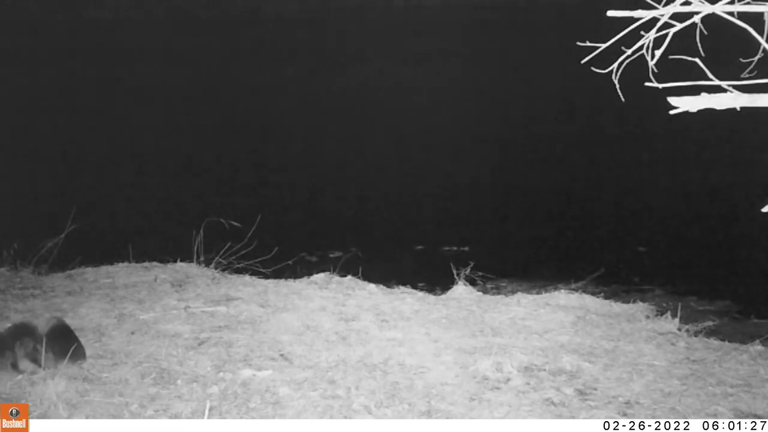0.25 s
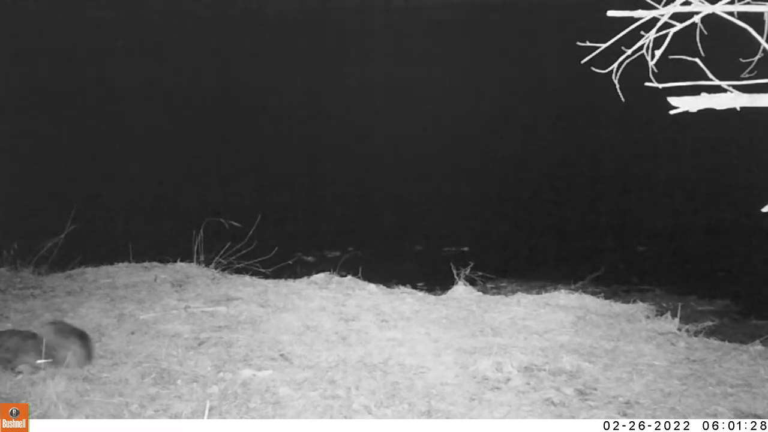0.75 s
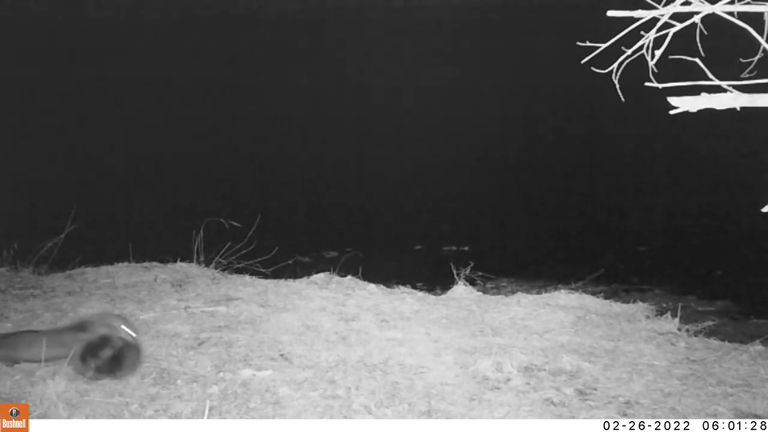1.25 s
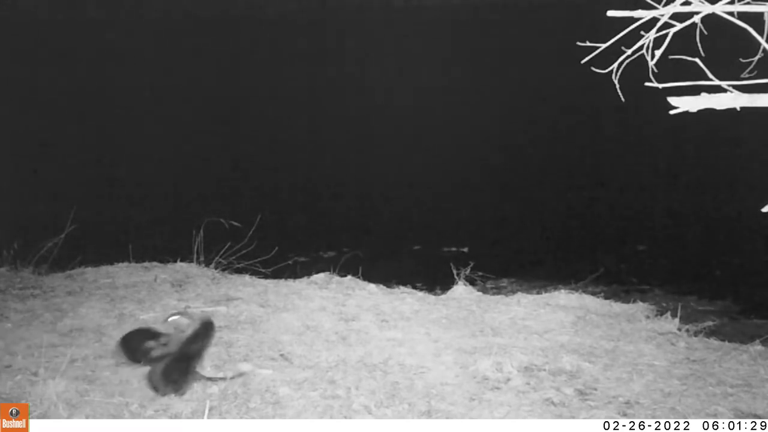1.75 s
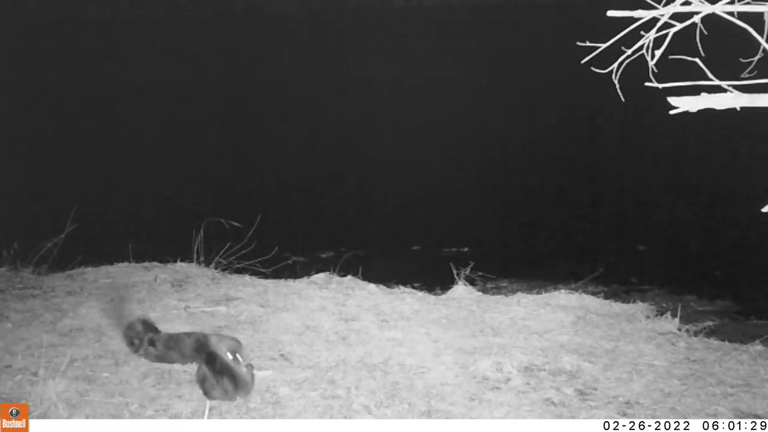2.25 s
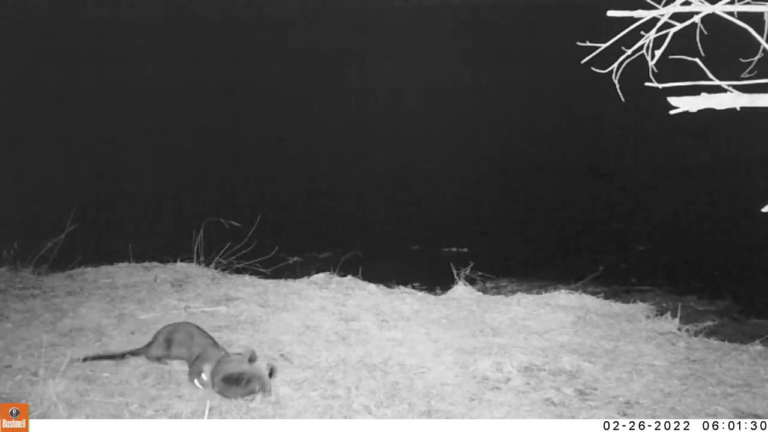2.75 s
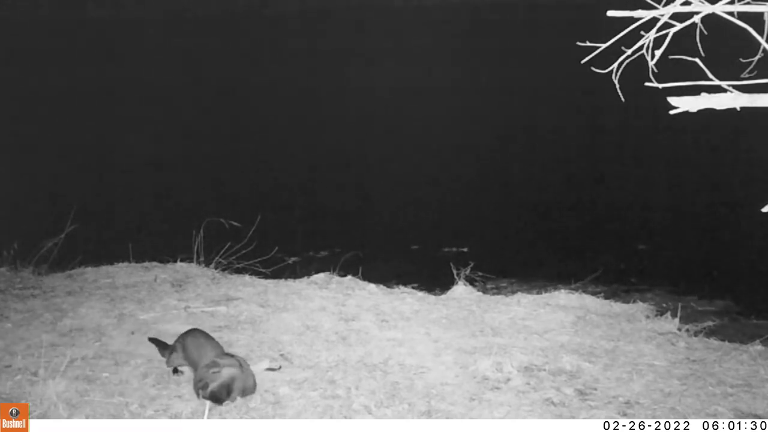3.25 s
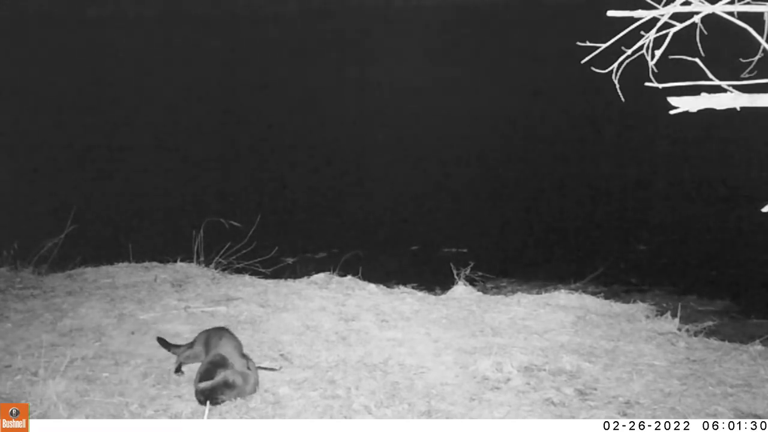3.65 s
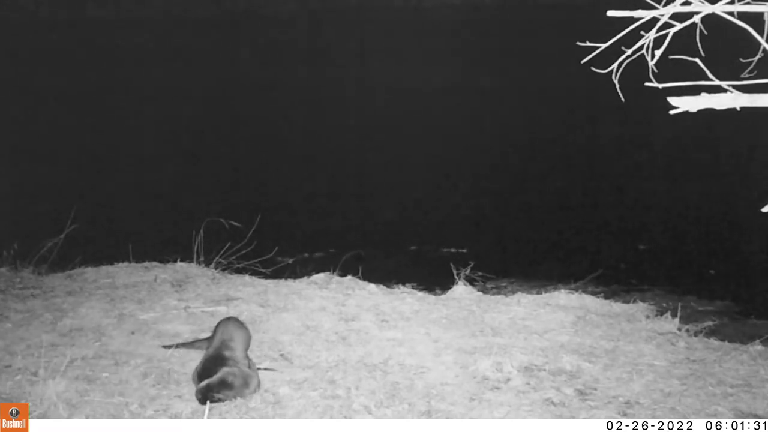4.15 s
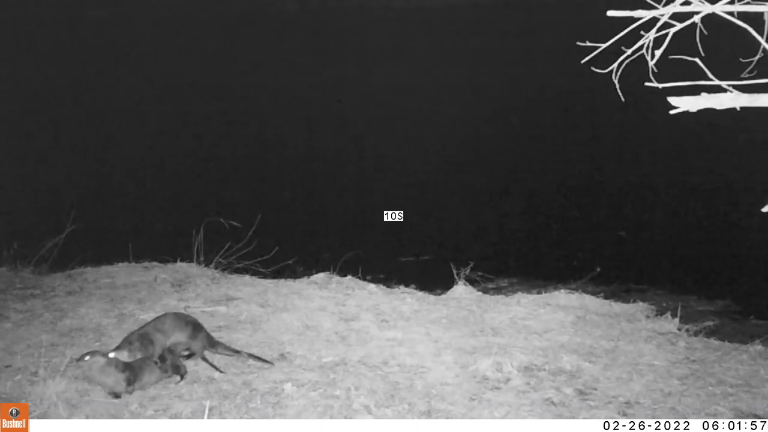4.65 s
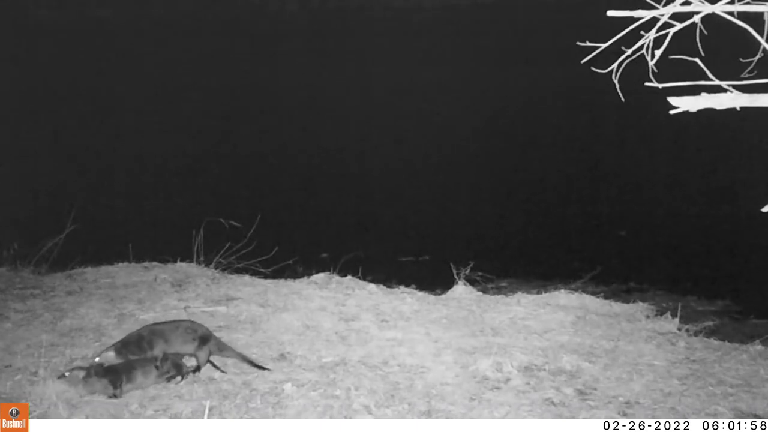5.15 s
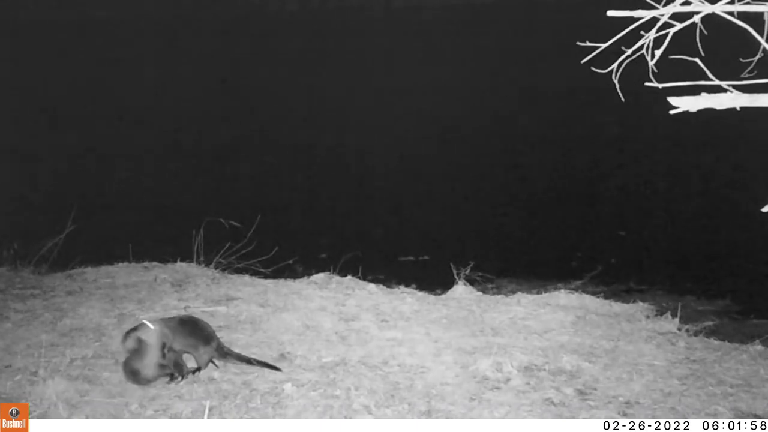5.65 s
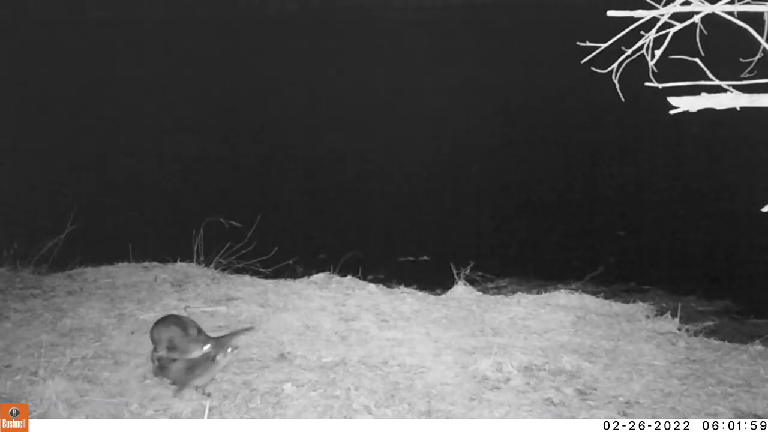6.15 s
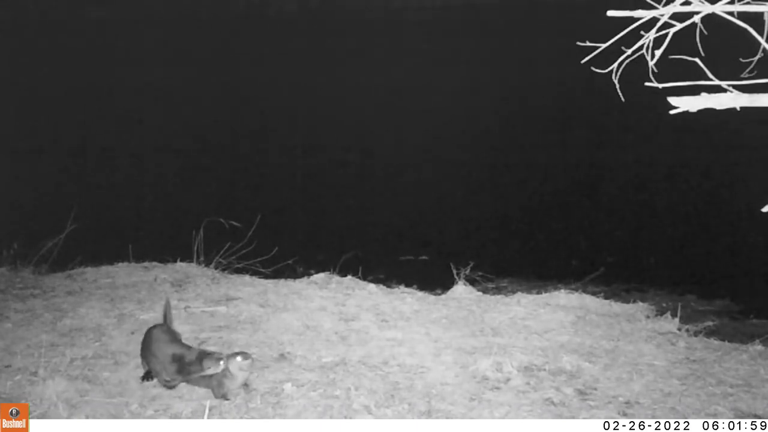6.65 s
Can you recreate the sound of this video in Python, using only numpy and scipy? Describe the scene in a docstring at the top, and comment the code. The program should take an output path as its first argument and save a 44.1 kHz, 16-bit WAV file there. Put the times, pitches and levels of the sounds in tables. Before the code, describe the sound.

Outdoors on a grassy riverbank at night, two wrestling otters chatter in short bouts of rapid rasps, about eight syllables a second, some breaking into squeals. Bodies swish and thud softly in the grass, with a couple of dry stalk snaps. Low rumble and faint hiss lie underneath. Midway the sound nearly cuts out, stays muffled in level, then jumps back, and a strong, steady squealing run follows. Mono, modest outdoor microphone, slightly dull on top.

```python
"""On a grassy riverbank at night, two otters wrestle in front of a trail camera.
They chatter in bouts of about eight syllables a second: a train of slaps rings the throat as a rasp,
and some syllables break into a squeal, a stack of sine waves whose pitch arches.
Filtered noise makes the grass scuffs, thuds and low rumble of the night.
The camera stops once, with a deep dip in level, and restarts at low gain before jumping to full gain."""
import sys
import numpy as np
from scipy import signal
from scipy.fft import rfft, irfft
from scipy.io import wavfile
from scipy.ndimage import uniform_filter1d, map_coordinates

SR = 44100
rng = np.random.default_rng(int(sys.argv[2]) if len(sys.argv) > 2 else 0)


def waveform_to_disk(signal):
    """Save audio, clipped to [-1, 1], as 16-bit WAV at the path in sys.argv[1]."""
    frames = np.transpose(np.atleast_2d(signal))
    scaled = np.clip(frames, -1, 1) * 32767
    samples = np.round(scaled).astype(np.int16)
    wavfile.write(sys.argv[1], SR, samples)


N = 304290
TIME = np.arange(N) / SR  # seconds

# Tone of the night rumble and hiss: hz, relative_db
NIGHT_TONE = [(8.8, -39), (15, 5.5), (59, -4.5), (143, -10.5), (207, -15), (246, -17.5), (473, -24),
              (686, -27), (2550, -42), (4140, -42), (5050, -47.5), (6530, -40.5), (13700, -55)]
# Bodies dragging through grass: peak_s, rise_s, fall_s, swish_db, thud_db (levels before the clumping)
SCUFFS = [(.4, 0.28, 0.49, -82, -71.5), (1.13, 0.31, 0.17, -64, -67.5), (1.55, 0.35, 0.43, -63, -68),
          (2.059, 0.24, 0.26, -63, -84), (2.73, 0.21, 0.13, -60.5, -76), (3.72, 0.11, 0.18, -65, -61.5),
          (4.49, 0.21, .1, -68.5, -64)]
# Dry stalks snapping: start_s, peak_db
STALK_SNAPS = [(0.336, -48), (1.146, -35)]
# Tone of rustling grass: hz, relative_db
GRASS_TONE = [(500, -19), (1300, -3.5), (4200, -0.5), (5200, -12), (6600, 4), (8300, -12), (13000, -17.5)]
# Tone of thuds on the turf: hz, relative_db
GROUND_TONE = [(100, -10.5), (320, 8.5), (460, -0.5), (680, 8), (1000, -12.5), (3000, -50)]
# Rasped syllables: start_s, end_s, level_db (before the push shapes it), pulses_hz (at full push),
# mouth_hz (middle of the glide), treble_db, jaw_share
# A positive jaw_share lets the mouth resonance fall as the mouth closes; a negative one lets it rise.
RASPS = [(0.006, 0.042, -53, 306, 3040, -3, .04), (0.11, 0.153, -47.5, 275, 2850, -11, 0.0033),
         (0.819, 0.862, -54.5, 293, 3530, -2, 0.028), (0.945, 0.996, -51, 290, 3000, 2, 0.071),
         (1.436, 1.444, -36, 266, 3900, 15, 0.015), (1.58, 1.618, -35, 360, 2950, 7.5, 0.044),
         (2.442, 2.482, -42, 300, 3810, 4.5, .05), (3.304, 3.342, -41.5, 290, 2780, 0.5, -0.08),
         (3.43, 3.474, -50.5, 275, 3400, 8, 0.031), (3.556, 3.599, -50, 318, 3337, 1, 0.086),
         (4.213, 4.247, -47, 300, 3290, -16, 0.038), (4.329, 4.385, -49, 320, 2877, -6, -0.05),
         (4.47, 4.531, -56, 330, 3935, -2, -0.043)]
# Low rattles with the mouth nearly shut: start_s, end_s, level_db (before the push shapes it),
# pulses_hz (at full push), mouth_hz (middle of the glide)
GROWLS = [(1.164, 1.185, -47, 330, 3600), (1.381, 1.429, -48, 205, 3536), (1.515, 1.53, -48.5, 260, 3600),
          (1.628, 1.688, -49, 150, 3400), (1.892, 1.937, -53, 170, 3100), (4.571, 4.688, -50.5, 250, 2693),
          (4.702, 4.999, -63.5, 170, 2630), (5.513, 5.572, -49, 230, 3483),
          (5.643, 5.688, -49.5, 280, 3202), (5.769, 5.82, -46, 273, 3635), (5.901, 5.904, -41.5, 340, 3588),
          (5.924, 5.97, -49, 277, 3700), (6.046, 6.104, -47.5, 290, 3295), (6.2, 6.242, -50, 310, 3240),
          (6.331, 6.381, -46, 300, 3600), (6.478, 6.539, -51, 290, 3220), (6.611, 6.658, -44, 280, 3194),
          (6.865, 6.884, -50, 280, 3160)]
# Single slaps of the vocal folds just ahead of a syllable: start_s, peak_db
LONE_SLAPS = [(2.43, -53), (3.164, -50), (3.277, -43), (3.412, -50), (5.421, -52), (6.793, -31.5)]
# Syllables that break into a squeal: start_s, top_s, end_s, top_pitch_hz,
# level_db (before the overall squeal trim), treble_db, roughness (0 to 1)
SQUEALS = [(0.687, 0.711, 0.733, 1695, -53.5, 5.5, 0.97), (1.057, 1.081, 1.12, 1646, -54, 13, 0.95),
           (1.186, 1.209, 1.24, 1639, -40, 4, 0.7), (1.314, 1.346, 1.368, 1713, -44, 5.5, 0.75),
           (1.448, 1.47, 1.508, 1702, -45, 9.5, 0.85), (1.694, 1.717, 1.757, 1591, -48.5, 2.5, 0.85),
           (1.819, 1.846, 1.873, 1533, -46.5, 4.5, 0.95), (1.946, 1.969, 2.005, 1656, -46.5, 6, 0.9),
           (2.312, 2.326, 2.353, 1581, -45, 3, 0.4), (3.173, 3.181, 3.207, 1814, -46.5, -1, 0.2),
           (4.078, 4.088, 4.113, 1294, -55.5, -5, 0.75), (5.324, 5.346, 5.36, 1564, -38.5, 1.5, 0.12),
           (5.446, 5.467, 5.497, 1590, -37.5, 10.5, 0.75), (5.569, 5.597, 5.634, 1907, -39, -1, 0.4),
           (5.7, 5.729, 5.766, 2147, -34.5, 1.5, 0.15), (5.824, 5.846, 5.886, 2333, -32.5, 13, 0.35),
           (5.963, 5.983, 6.033, 2173, -33.5, 10, 0.25), (6.108, 6.127, 6.19, 1744, -41, -6, 0.35),
           (6.248, 6.28, 6.33, 1877, -40, -4, 0.3), (6.384, 6.418, 6.473, 1737, -41, -5, 0.4),
           (6.544, 6.563, 6.603, 1552, -40.5, 3, 0.35), (6.654, 6.698, 6.746, 1399, -38, 8.5, 0.6),
           (6.809, 6.831, 6.856, 1408, -37, 9.5, 0.4)]
# How the throat colours a rasp: hz, relative_db
RASP_THROAT = [(500, -32), (1300, -13), (1900, -17), (2400, -3), (4200, -5.5), (5200, -13), (6400, -7),
               (7200, -11.5), (8300, -21), (10300, -39.5), (11800, -80)]
# How the throat colours a squeal: hz, relative_db
SQUEAL_THROAT = [(1000, -19), (1500, -15), (1900, -9), (2800, -0.5), (4400, 1), (5500, -15.5), (6600, -5.5),
                 (7600, -27.5), (9200, -33.5), (11500, -77)]

NIGHT_DB = -53.5
ATTACK_S, RELEASE_S, SAG_DB = .013, .024, 4  # fast start, strongest middle, slower ending
SLACK_RATE = 0.79  # share of the pulse rate left when the push has gone
GROWL_TREBLE_DB = -3.5
JAW_SHARE = 0.056  # mouth glide in growls and squeals
# Lift of the lowest throat resonance, which sounds when the mouth is wide open
LOW_RASP_DB, LOW_FLANK_DB, LOW_GROWL_DB = 7.5, 3.5, -2
# The rasp on both sides of a squeal's top
SQUEAL_PULSE_HZ, SQUEAL_MOUTH_HZ = 321.5, 3680
FLANK_DB, FLANK_ROUGH_DB = -5, 10  # level beside a clean squeal, and what full roughness adds
FLANK_LEAD_S, FLANK_TRAIL_S = .0015, .003  # how far it reaches beyond the squeal's start and end
BREAK_HZ = 967  # pitch toward which a squeal sinks at both ends
ARCH_FLATNESS = 2.8  # higher keeps the pitch near its top for longer
OVERTONE_DB, OVERTONE_SHARE = -4, 0.62  # upper squeal partials follow this share of the treble
STOP_S, RESTART_S, AWAKE_S = 4.542, 4.575, 5.108  # stop, low-gain restart, full gain
EDGE_HZ = 13850  # upper band limit


def amp(db):
    """Turns decibels into gain."""
    return 10 ** (np.asarray(db) / 20)


def unit(x):
    """Scales a sound to an average (rms) strength of 1."""
    return x / np.sqrt(np.mean(x ** 2) + 1e-20)


def read(points, hz):
    """Reads a tone curve in dB, spacing frequency by its logarithm."""
    point_hz, point_db = np.transpose(points)
    return np.interp(np.log(hz + 1), np.log(point_hz), point_db)


def bump(hz, center_hz, width_hz):
    """Draws one rounded resonance with a height of 1."""
    return np.exp(-.5 * ((hz - center_hz) / width_hz) ** 2)


def add(mix, start_s, sound):
    """Mixes a sound in at its start time, cutting whatever lies outside the scene."""
    at = round(start_s * SR)
    part = mix[max(at, 0):max(at + len(sound), 0)]
    part += sound[max(-at, 0):][:len(part)]


def colour(x, gain_db, size=2048):
    """Filters with the curve gain_db(hz) so that ringing comes only after each pulse."""
    log_gain = np.log(amp(gain_db(np.fft.rfftfreq(size, 1 / SR))))
    # Folding the cepstrum forward in time gives the filter with no ringing ahead
    cepstrum = irfft(log_gain)
    cepstrum[1:size // 2] *= 2
    cepstrum[size // 2 + 1:] = 0
    response = irfft(np.exp(rfft(cepstrum)))
    return signal.fftconvolve(x, response)[:len(x)]


def shaped(x, points):
    """Gives a scene-long noise a tone curve, at rms 1."""
    gain = amp(read(points, np.fft.rfftfreq(N, 1 / SR)))
    return unit(irfft(rfft(x) * gain, N))


def wobble(count, hz):
    """Joins random values by straight lines, about hz new ones a second, at rms 1."""
    at = np.arange(count) * hz / SR
    return unit(map_coordinates(rng.standard_normal(count), [at], order=1))


def swell(t, peak_s, rise_s, fall_s, attack_curve=2.13, fade_curve=1.55):
    """Makes a rounded burst that is 20 dB below its peak at its rise and fall times."""
    before = (abs(peak_s - t) / rise_s) ** attack_curve
    after = (abs(t - peak_s) / fall_s) ** fade_curve
    away = np.where(t < peak_s, before, after)
    return amp(-20 * np.minimum(away, 10))


def night(waver_db=1, waver_hz=8):
    """Low rumble and faint hiss: shaped noise that gently wavers."""
    level = amp(NIGHT_DB + waver_db * wobble(N, waver_hz))
    return level * shaped(rng.standard_normal(N), NIGHT_TONE)


def bank(x, wet_db=-19, t60_s=0.39):
    """Turf and branches scatter sound into many weak, quickly dying echoes."""
    t = TIME[:SR // 2]
    hits = rng.random(len(t)) < 2000 / SR  # about 2000 echoes a second
    echoes = rng.standard_normal(len(t)) * hits * amp(-60 * t / t60_s)
    scatter = signal.fftconvolve(x, echoes / np.linalg.norm(echoes))[:N]
    return x + amp(wet_db) * scatter


def ground_bounce(x):
    """The voice also glances off the turf, on an extra path that changes as the heads move."""
    strength, delay_s, sway_s, moves_hz = .25, .0013, .0003, 5
    delay = delay_s + sway_s * wobble(N, moves_hz)
    return x + strength * np.interp(TIME - delay, TIME, x)


def stalk_snap(peak_db, snap_s=0.00063):
    """A breaking dry stalk gives a tiny noise burst with the tone of grass."""
    t = TIME[:512]
    burst = rng.standard_normal(len(t)) * np.exp(-t / snap_s)
    snap = colour(burst, lambda hz: read(GRASS_TONE, hz))
    return amp(peak_db) * snap / abs(snap).max()


def scuffle(blades_per_s=6000, spread_db=2.0, clump_db=2.5, clump_hz=60):
    """Many blades of grass crackle under the rolling bodies, which also thud on the turf."""
    strength_db = spread_db * np.minimum(rng.exponential(1, N), 4)
    touched = rng.random(N) < blades_per_s / SR
    blades = rng.standard_normal(N) * amp(strength_db) * touched
    swish, thud = np.zeros((2, N))
    for peak_s, rise_s, fall_s, swish_db, thud_db in SCUFFS:
        burst = swell(TIME, peak_s, rise_s, fall_s)
        swish += amp(swish_db) * burst
        thud += amp(thud_db) * burst
    out = swish * shaped(blades, GRASS_TONE)
    out += thud * shaped(rng.standard_normal(N), GROUND_TONE)
    out *= amp(clump_db * wobble(N, clump_hz))
    for start_s, peak_db in STALK_SNAPS:
        add(out, start_s, stalk_snap(peak_db))
    return out


def hump(t, start, end):
    """Rises from 0 to 1 and back between start and end."""
    return np.sin(np.pi * np.clip((t - start) / (end - start), 0, 1))


def effort(t, start, end):
    """The push behind a syllable: attack, a rounded hold, release."""
    nearest = np.clip(t, start, end)
    edges = swell(t, nearest, ATTACK_S, RELEASE_S, attack_curve=1.1, fade_curve=1.05)
    return edges * amp(SAG_DB * (hump(t, start, end) - 1.5))


def pulsed_parts():
    """Lists all pulsed voice: RASPS columns, low_db, and the share that gives way to a squeal."""
    rasps = [(*row, LOW_RASP_DB, 0) for row in RASPS]
    growls = [(*row, GROWL_TREBLE_DB, JAW_SHARE, LOW_GROWL_DB, 0) for row in GROWLS]
    flanks = []
    for start, _, end, _, db, treble_db, rough in SQUEALS:
        level_db = db + FLANK_DB + FLANK_ROUGH_DB * rough
        yields = np.clip(1 - rough ** 2, 0, 1)
        flanks.append((start - FLANK_LEAD_S, end + FLANK_TRAIL_S, level_db, SQUEAL_PULSE_HZ,
                       SQUEAL_MOUTH_HZ, treble_db, JAW_SHARE, LOW_FLANK_DB, yields))
    return rasps + growls + flanks


def folds():
    """Vocal folds slap together in one train through all syllables, each slap with a puff of air."""
    jitter, shimmer_db, puff, puff_s, leak = .03, 1.3, .07, .001, .013
    t = TIME[::64]  # a coarse clock is enough for the slow rate changes
    # The syllable that presses hardest counts most; the rate slackens with its push
    press, rates = [], []
    for start, end, level_db, pulses_hz, *_ in pulsed_parts():
        push = effort(t, start, end)
        press.append((amp(level_db) * push) ** 2)
        rates.append(pulses_hz * (SLACK_RATE + (1 - SLACK_RATE) * push))
    rate = np.interp(TIME, t, np.average(np.array(rates), axis=0, weights=np.array(press)))
    turns = np.cumsum(rate * (1 + jitter * wobble(N, rate.mean()))) / SR
    slaps = np.diff(np.floor(turns), prepend=0)  # one slap at each whole turn
    since_slap_s = (turns % 1) / rate
    air = (leak + puff * np.exp(-since_slap_s / puff_s)) * rng.standard_normal(N)
    # Each slap bounces up and down the short throat, which spreads it into a burst of a few cycles
    trip_s, bounce = .0003, .6
    loop = np.r_[1, np.zeros(round(trip_s * SR)), bounce]
    bounced = signal.lfilter(loop[::-1], loop, slaps + air)
    return bounced * amp(shimmer_db * wobble(N, rate.mean()))


def lone_slap(peak_db, puff_s=0.00038, mouth_db=12, mouth_hz=3000, mouth_width_hz=550):
    """One slap of the folds rings the throat and the barely open mouth."""
    t = TIME[:512]
    burst = rng.standard_normal(len(t)) * np.exp(-t / puff_s)

    def throat(hz):
        """Throat tone plus the mouth resonance, in dB."""
        return read(RASP_THROAT, hz) + mouth_db * bump(hz, mouth_hz, mouth_width_hz)

    slap = colour(burst, throat)
    return amp(peak_db) * slap / abs(slap).max()


def rasp(drive, start, end, level_db, mouth_hz, treble_db, jaw_share, low_db, yields,
         mouth_db=9, mouth_width_hz=450, treble_hz=6750, treble_width_hz=850, jaw_treble_db=3,
         low_hz=1780, low_width_hz=340):
    """One syllable: the slaps swell and fade, and ring the throat and three mouth resonances."""
    span = (TIME > start - 3 * ATTACK_S) & (TIME < end + 3 * RELEASE_S)
    t = TIME[span]
    ripple_db, ripple_hz = 2.5, 450

    def ring(opening):
        """One pose of the head: tongue and teeth add peaks and dips of their own."""
        grid_hz = np.arange(0, SR / 2, ripple_hz)
        ripple = ripple_db * rng.standard_normal(len(grid_hz))

        def throat(hz):
            """All resonances of this pose, in dB."""
            mouth = mouth_db * bump(hz, mouth_hz * (1 + jaw_share * opening), mouth_width_hz)
            bright_db = treble_db + jaw_treble_db * opening
            treble = bright_db * bump(hz, treble_hz, treble_width_hz)
            low = low_db * bump(hz, low_hz, low_width_hz)
            return read(RASP_THROAT, hz) + low + mouth + treble + np.interp(hz, grid_hz, ripple)

        return unit(colour(drive[span], throat))

    # A fade between two poses moves the mouth resonance and dulls the treble
    closing = np.interp(t, [start, end], [0, 1])
    voice = (1 - closing) * ring(0.63) + closing * ring(-0.94)
    room_for_squeal = 1 - yields * hump(t, start, end) ** .7
    return t[0], amp(level_db) * effort(t, start, end) * room_for_squeal * unit(voice)


def squeal(start, top, end, top_hz, level_db, treble_db, rough, flutter=0.56, jitter=.085,
           flutter_hz=560, rising_db=-8, falling_db=-6, drift_db=2, drift_hz=110):
    """A high whistle of the folds: its pitch arches, cleanest at the top and frayed at both ends."""
    overhang, taper, edge_rough = .28, .3, .4
    first_s = start - overhang * (top - start)
    last_s = end + overhang * (end - top)
    t = np.arange(first_s, last_s, 1 / SR)
    from_top = np.where(t < top, (top - t) / (top - start), (t - top) / (end - top))
    away = from_top ** ARCH_FLATNESS
    droop = np.tanh(away)
    fray = rough + edge_rough * droop
    arch_hz = top_hz - (top_hz - BREAK_HZ) * droop
    hz = arch_hz * (1 + jitter * rough * fray * wobble(len(t), flutter_hz))
    phase = 2 * np.pi * np.cumsum(hz) / SR
    overtone_db = OVERTONE_DB + OVERTONE_SHARE * treble_db
    voice = np.zeros(len(t))
    for k in range(1, 9):
        partial_db = read(SQUEAL_THROAT, k * hz) + drift_db * wobble(len(t), drift_hz)
        partial_db += overtone_db * (k > 2)
        voice += amp(partial_db) * np.sin(k * phase)
    voice *= 1 + flutter * fray * np.tanh(wobble(len(t), flutter_hz))
    # The whistle needs time to build up, so its rising flank is the weaker one
    voice *= amp(away * np.where(t < top, rising_db, falling_db))
    return t[0], amp(level_db) * unit(voice) * signal.windows.tukey(len(t), taper)


def otters(rasp_db=0, squeal_db=-1):
    """Builds the chatter from pulsed rasps, lone slaps of the folds and whistled squeals."""
    rasps, squeals = np.zeros((2, N))
    drive = folds()
    for start, end, level_db, _, *mouth in pulsed_parts():
        add(rasps, *rasp(drive, start, end, level_db, *mouth))
    for start_s, peak_db in LONE_SLAPS:
        add(rasps, start_s, lone_slap(peak_db))
    for row in SQUEALS:
        add(squeals, *squeal(*row))
    return amp(rasp_db) * rasps + amp(squeal_db) * squeals


def scene():
    """Voices and scuffling scatter over the open bank, above the night rumble, in mono."""
    voices = ground_bounce(otters())
    return (bank(voices + scuffle()) + night())[None]


def record(dry, waking_db=-19, stopped_db=-34):
    """The camera stops, restarts at low gain, then jumps to full gain; a steep treble cut follows."""
    periods = [TIME < STOP_S, TIME < RESTART_S, TIME < AWAKE_S]
    gain_db = np.select(periods, [0, stopped_db, waking_db], 0)
    gain = uniform_filter1d(amp(gain_db), size=40)  # softens each jump over about 1 ms
    lowpass = signal.firwin(511, EDGE_HZ, window=("kaiser", 9), fs=SR)
    return signal.oaconvolve(dry * gain, lowpass[None], "same")


dry = scene()
out = record(dry)
waveform_to_disk(out)
```